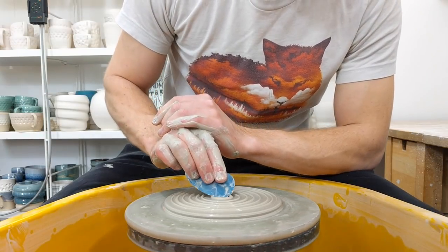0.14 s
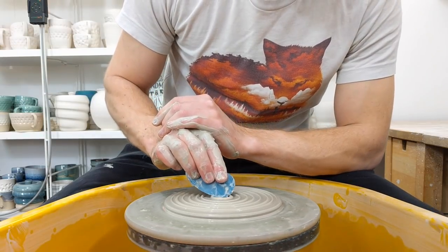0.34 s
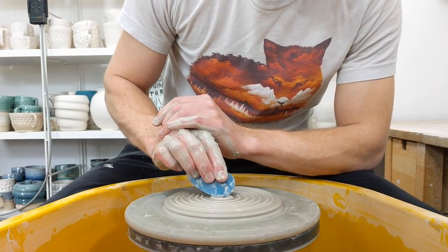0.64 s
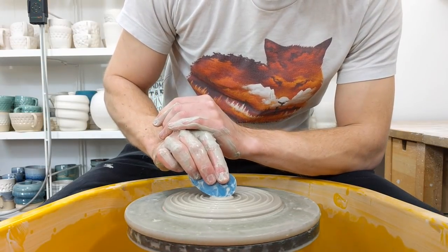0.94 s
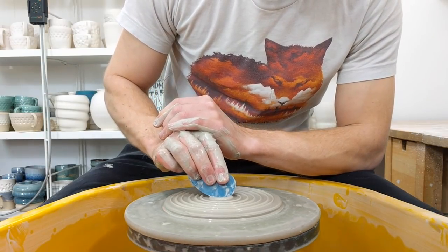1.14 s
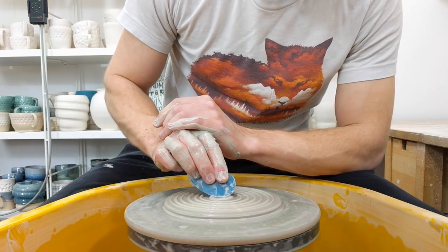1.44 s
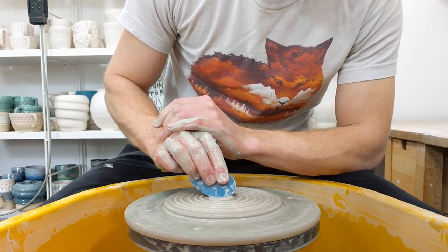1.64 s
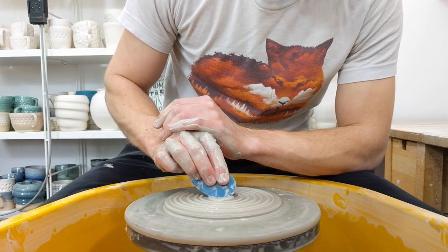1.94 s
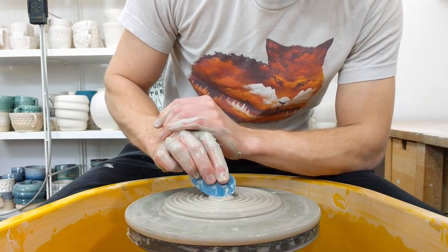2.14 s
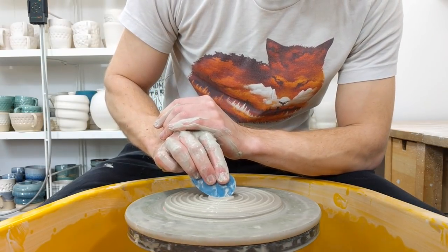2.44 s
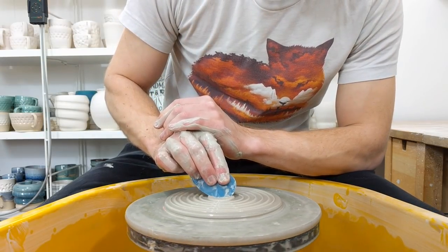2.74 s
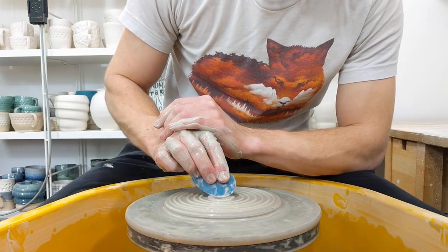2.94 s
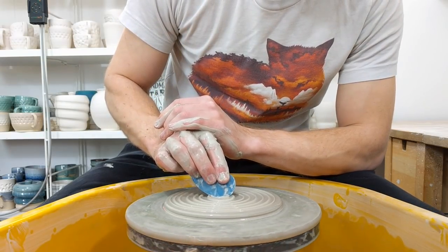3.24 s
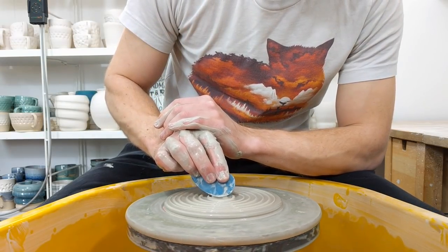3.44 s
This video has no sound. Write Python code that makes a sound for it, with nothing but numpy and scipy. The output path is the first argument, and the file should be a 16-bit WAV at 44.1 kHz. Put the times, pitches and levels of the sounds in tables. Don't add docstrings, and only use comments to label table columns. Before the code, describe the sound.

A pottery wheel's electric motor hums low, buzzy and constant throughout, swaying gently about every 0.6 seconds above a deeper drone. A wet sponge hisses softly on clay. Frame knocks and bright grit ticks sound around 0.1 seconds, a dull tick at 0.75, faint drops from 1.0 to 1.3, sharp ticks at 1.4 and 1.8. A double thud at 3.1 precedes the drone fading and faint squeaks.

```python
import sys
import numpy as np
from scipy import signal
from scipy.fft import rfft, irfft
from scipy.io import wavfile

SR = 44100
rng = np.random.default_rng(int(sys.argv[2]) if len(sys.argv) > 2 else 0)


def master_out(mix):
    frames = np.transpose(np.atleast_2d(mix))
    ceiling = np.clip(frames, -1, 1)
    pcm = np.round(ceiling * 32767).astype(np.int16)
    wavfile.write(sys.argv[1], SR, pcm)


def volts(x):
    e = np.asarray(x, float) / 20
    return 10 ** e


N = 158760
TIME_S = np.arange(N) / SR


def evened(x):
    return x / np.sqrt(np.mean(x ** 2) + 1e-20)


def add(mix, start_s, sound):
    part = mix[round(start_s * SR):][:len(sound)]
    part += sound[:len(part)]


def resonate(x, hz, width_hz):
    carrier = np.exp(2j * np.pi * hz * np.arange(len(x)) / SR)
    pole = np.exp(-np.pi * width_hz / SR)
    smooth = signal.lfilter([1 - pole], [1, -pole], x / carrier)
    return 2 * (carrier * smooth).real


def band(x, hz, width_hz):
    return evened(resonate(resonate(x, hz, width_hz), hz, width_hz))


def decay(u_s, db, t60_s, rise_s):
    return volts(db - 60 * u_s / t60_s) * np.minimum(u_s / rise_s, 1)


def wander(top_hz):
    t = np.arange(0, N + 256, 256) / SR
    hz = np.geomspace(top_hz / 20, top_hz, num=16)[:, None]
    drift = np.sin(2 * np.pi * (hz * t + rng.random(hz.shape))).sum(0)
    return np.interp(TIME_S, t, evened(drift))


WHEEL_TURN_S, WHEEL_TOP_S = .62, .3


def wheel():
    return np.cos(2 * np.pi * (TIME_S - WHEEL_TOP_S) / WHEEL_TURN_S)


HUM_HZ, HUM_DB = 99.881, -45.5
FLUTTER_DB, FLUTTER_TURNS = .3, .002
SETTLE_ORDER, SETTLE_DB, SETTLE_S = 5, 14, 0.46
# (multiple of hum [1], level [dB])
HUM_ORDERS = [(1, 1), (2, -1), (3, -4.5), (4, -12.5), (5, -31), (6, -15.5), (7, -13), (8, -19), (9, -33),
              (10, -44), (11, -36), (12, -34), (13, -34), (14, -26), (15, -31), (16, -23), (17, -26),
              (18, -35), (19, -32), (20, -34), (21, -37), (22, -44), (23, -42), (24, -38), (25, -42),
              (26, -43), (27, -42), (28, -41), (29, -41), (34, -44)]
# (multiple of hum [1], sway per wheel turn [dB], creep [dB/s])
HUM_SWAY = [(1, -0.1, 0.9), (2, 0.26, 0.18), (3, 0.57, 0.55), (4, 3, -0.36), (6, 1, -0.7), (7, -0.2, -1.34),
            (8, -0.1, -0.1), (16, -1.7, -0.2), (17, 1.5, 0.5)]
# (first multiple [1], last multiple [1], delay [ms], lag [turns])
HUM_PARTS = [(1, 3, 4.9, -.31), (4, 5, 6.25, .67), (6, 10, 5.3, .635), (14, 17, .4, .39)]


def hum():
    turn, out = wheel(), np.zeros(N)
    sway = {k: (deep_db, creep) for k, deep_db, creep in HUM_SWAY}
    shake_turns = FLUTTER_TURNS * wander(12)
    for k, db in HUM_ORDERS:
        delay_ms, lag = 0, rng.random()
        for first, last, part_ms, part_lag in HUM_PARTS:
            if first <= k <= last:
                delay_ms, lag = part_ms, part_lag
        deep_db, creep = sway.get(k, (0, 0))
        level_db = HUM_DB + db + deep_db * turn + creep * (TIME_S - TIME_S.mean())
        level_db = level_db + FLUTTER_DB * np.log(k + .5) * wander(8)
        if k == SETTLE_ORDER:
            level_db = level_db + SETTLE_DB * np.exp(-TIME_S / SETTLE_S)
        turns = k * (HUM_HZ * (TIME_S - delay_ms / 1000) + shake_turns) + lag
        out += volts(level_db) * np.cos(2 * np.pi * turns)
    return out


DRONE_HZ, DRONE_SWAY_DB = 83.7, 1.5
THUMP_RISE_S, THUMP_T60_S = .03, .6
# (time [s], level [dB])
DRONE_LOAD = [
    (0, -54.5),
    (.4, -56.5),
    (1.5, -59.5),
    (2.6, -55),
    (3.05, -57),
    (3.3, -80),
    (3.6, -74),
]
# (frequency [Hz], width [Hz], level [dB])
RUMBLE_BANDS = [(57.4, 10, -67), (75, 7.4, -69), (122.4, 6.9, -74)]
# (time [s], level [dB], frequency [Hz])
FRAME_KNOCKS = [
    (0.128, -49, 105),
    (.17, -53, 54.6),
    (.92, -64, 55.5),
    (1.93, -65, 107),
    (2.17, -56, 60),
    (3.085, -45, 73),
    (3.14, -44, 77.3),
]


def frame():
    level_db = np.interp(TIME_S, *np.transpose(DRONE_LOAD))
    level_db = level_db + DRONE_SWAY_DB * np.roll(wheel(), round(.1 * SR)) + 0.35 * wander(8.7)
    turns = DRONE_HZ * TIME_S - .42 + 0.0067 * wander(1.8)
    out = np.sqrt(2) * volts(level_db) * np.cos(2 * np.pi * turns)
    for hz, width_hz, db in RUMBLE_BANDS:
        out += volts(db) * band(rng.standard_normal(N), hz, width_hz)
    u_s = TIME_S[:SR // 2]
    rise = np.minimum(u_s / THUMP_RISE_S, 1) ** 2
    for start_s, db, hz in FRAME_KNOCKS:
        add(out, start_s, volts(db - 60 * u_s / THUMP_T60_S) * rise * np.sin(2 * np.pi * hz * u_s))
    return out


# (frequency [Hz], width [Hz], level [dB])
SHELL_MODES = [(573, 90, -77.5), (687, 250, -75.5), (923, 150, -82.5), (1433, 65, -79), (1740, 820, -77),
               (2100, 38, -82.5)]
# (frequency [Hz], width [Hz], level [dB])
BEARING_WHINE = (3200, 110, -88)


def housing():
    pulse = 1 + 0.58 * np.cos(2 * np.pi * HUM_HZ * TIME_S)
    out = np.zeros(N)
    for hz, width_hz, db in [*SHELL_MODES, BEARING_WHINE]:
        out += volts(db + 0.69 * wander(5.8)) * band(pulse * rng.standard_normal(N), hz, width_hz)
    return out


GRAINS_PER_S, GRAIN_SPREAD_DB = 5000, 2
PRESS_DB, PRESS_SWING = -66, 1.6
# (time [s], level [dB])
SPONGE_PRESSURE = [(0, -64), (.1, -64.5), (.16, -66), (.3, -68), (.46, -67.5), (.75, -66), (.9, -67.5),
                   (1.25, -66), (1.45, -67), (1.56, -66.5), (1.95, -65), (2.25, -67.5), (2.62, -66.5),
                   (2.95, -66.5), (3.25, -65), (3.5, -66.5), (3.6, -64)]
# (frequency [Hz], width [Hz], level [dB])
WET_BANDS = [(6600, 2500, 14.5), (4880, 3000, 7), (8500, 2200, -2.5)]


def sponge():
    size, chance, side = rng.random((3, N))
    grains = volts(-GRAIN_SPREAD_DB * np.log(size + 1e-4)) * (chance < GRAINS_PER_S / SR) * np.sign(side - .5)
    grains += 0.39 * rng.standard_normal(N)
    time_s, db = np.transpose(SPONGE_PRESSURE)
    swing_db = PRESS_SWING * np.interp(TIME_S, time_s, db - db.mean())
    press = volts(PRESS_DB + swing_db + .6 * wander(40))
    hiss = sum(volts(wet_db) * band(grains, hz, width_hz) for hz, width_hz, wet_db in WET_BANDS)
    return press * evened(hiss)


SCUFF_T60_S = .2
# (time [s], level [dB], frequency [Hz], decay T60 [s])
GRIT_TICKS = [
    (0.068, -40, 6900, 0.0074),
    (.096, -41, 7060, .008),
    (.750, -43, 2400, 0.013),
    (.7502, -60, 2920, .008),
    (1.374, -48, 6200, .01),
    (1.381, -39, 4970, 0.0056),
    (1.828, -43, 6600, .006),
]
# (time [s], level [dB], frequency [Hz], width [Hz])
GRIT_SCUFFS = [
    (1.374, -56, 6200, 7000),
    (1.385, -61, 5500, 3500),
    (1.405, -63, 6500, 3000),
    (.005, -66, 6500, 2000),
    (.06, -63, 7200, 2500),
    (.095, -63, 7000, 2500),
    (.488, -64, 6000, 3500),
    (1.665, -62, 6200, 3000),
    (1.89, -65, 6500, 2500),
    (2.62, -66, 6000, 5000),
]


def grit():
    out, u_s = np.zeros(N), np.arange(SR // 4) / SR
    for start_s, db, hz, t60_s in GRIT_TICKS:
        add(out, start_s, decay(u_s, db, t60_s, 0.0011) * np.sin(2 * np.pi * hz * u_s))
    for start_s, db, hz, width_hz in GRIT_SCUFFS:
        rub = rng.standard_normal(len(u_s)) * volts(2.5 * rng.exponential(size=len(u_s)))
        add(out, start_s, decay(u_s, db, SCUFF_T60_S, 0.001) * band(rub, hz, width_hz))
    return out


TAP_T60_S, SQUEAK_HZ = .07, 3174
# (time [s], level [dB], frequency [Hz])
PAN_DROPS = [
    (1.035, -60, 550),
    (1.143, -53, 720),
    (1.145, -62, 990),
    (1.147, -60, 1300),
    (1.229, -61, 900),
    (1.322, -57, 600),
]
# (time [s], length [s], level [dB])
PAN_SQUEAKS = [
    (1.3, .12, -78),
    (3.2, .11, -75),
    (3.32, .07, -76),
    (3.46, .14, -78),
]


def pan():
    out, u_s, waver = np.zeros(N), np.arange(SR // 5) / SR, wander(30)
    for start_s, db, hz in PAN_DROPS:
        add(out, start_s, decay(u_s, db, TAP_T60_S, 0.0032) * np.sin(2 * np.pi * hz * u_s))
    for start_s, length_s, db in PAN_SQUEAKS:
        hz = SQUEAK_HZ + 25 * waver[round(start_s * SR) - len(u_s):][:len(u_s)]
        swell = np.sqrt(2 * abs(np.sin(np.pi * np.minimum(u_s / length_s, 1))))
        add(out, start_s, volts(db) * swell * np.sin(2 * np.pi * np.cumsum(hz) / SR))
    return out


ROOM_T60_S, ROOM_DB = .12, -5


def room(x):
    at = np.arange(60, SR // 4, 20)
    taps = np.zeros(SR // 4 + 20)
    signs = rng.choice([-1., 1.], len(at))
    taps[at + rng.integers(0, 20, len(at))] = signs * volts(-60 * at / SR / ROOM_T60_S)
    taps *= volts(ROOM_DB) / np.linalg.norm(taps)
    taps[0] = 1
    return signal.fftconvolve(x, taps / np.linalg.norm(taps))[:N]


AIR_DB = -61
# (frequency [Hz], density [dB per Hz])
AIR_SPECTRUM = [(20, -9.5), (60, 12.5), (160, 3.5), (350, -0.5), (1000, -7), (3000, -9), (9000, -17),
                (16000, -13.5)]


def air():
    bin_hz = np.fft.rfftfreq(N, 1 / SR)
    hz, db = np.transpose(AIR_SPECTRUM)
    gain = volts(np.interp(np.log(bin_hz + 1), np.log(hz), db))
    return volts(AIR_DB) * evened(irfft(rfft(rng.standard_normal(N)) * gain, N))


def scene():
    machine = hum() + frame()
    details = pan() + grit()
    return (machine + details + room(housing() + sponge()) + air())[None]


def band_limit(x):
    return signal.sosfilt(signal.butter(12, 15890, fs=SR, output="sos"), x)


EDGE_HZ, OFFSET = 15730, -.0012
STARVED_WIDTH_HZ, STARVED_SHARE = 300, .11
STARVED_BANDS_HZ = (11500, 13100, 13800, 14600)


def record(dry):
    edge = signal.firwin(1023, EDGE_HZ, window=("kaiser", 8), fs=SR)
    limited = signal.oaconvolve(dry, edge[None], "same")
    hz, _, z = signal.stft(limited, SR, nperseg=1024, noverlap=512)
    for centre_hz in STARVED_BANDS_HZ:
        share = STARVED_SHARE * (centre_hz / STARVED_BANDS_HZ[-1]) ** 6
        off = np.repeat(rng.random(z.shape[-1]) < share, 2)[:z.shape[-1]]
        z = z * (1 - .95 * np.outer(abs(hz - centre_hz) < STARVED_WIDTH_HZ, off))
    mix = signal.istft(z, SR, nperseg=1024, noverlap=512)[1][:, :N] + OFFSET
    return band_limit(mix)


dry = scene()
out = record(dry)
master_out(out)
```